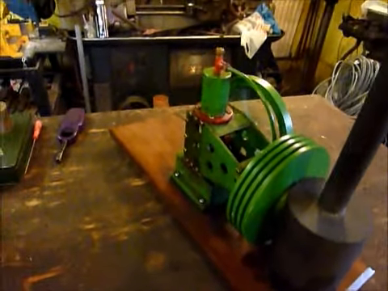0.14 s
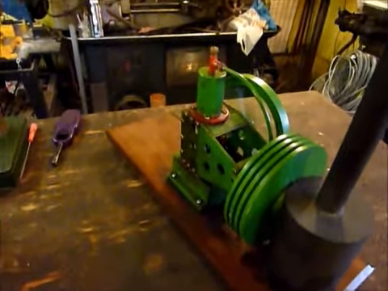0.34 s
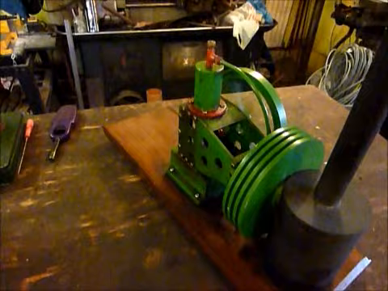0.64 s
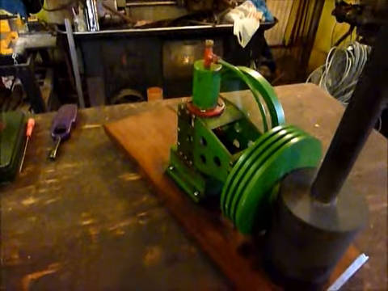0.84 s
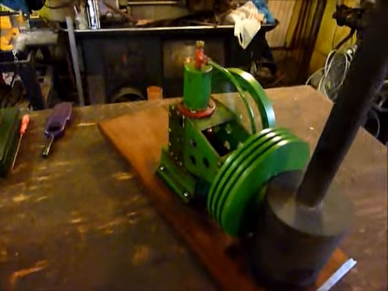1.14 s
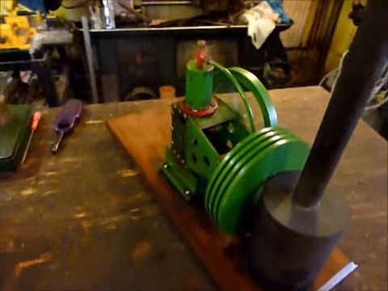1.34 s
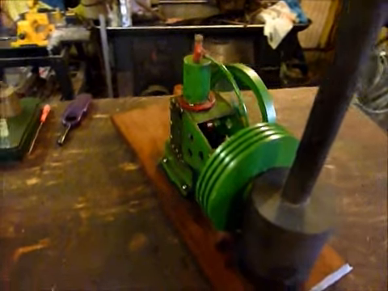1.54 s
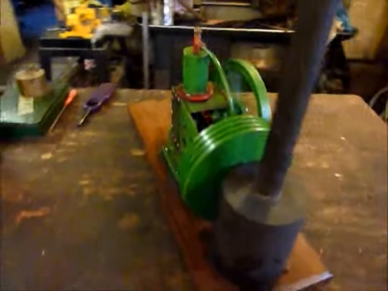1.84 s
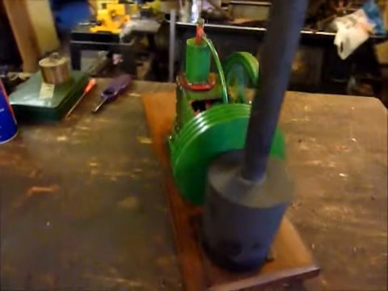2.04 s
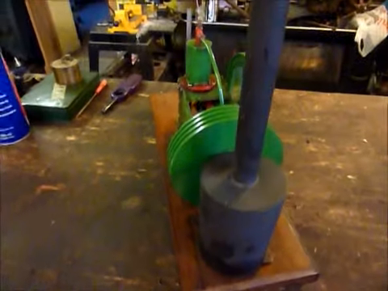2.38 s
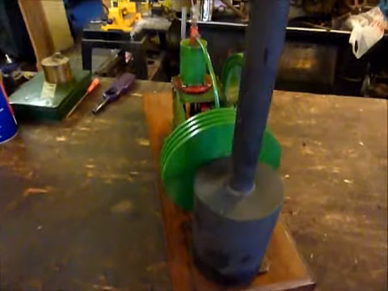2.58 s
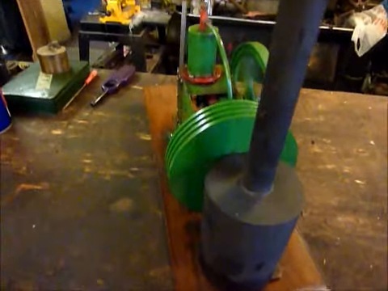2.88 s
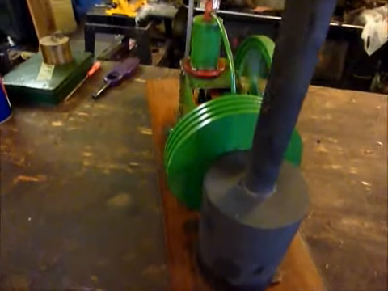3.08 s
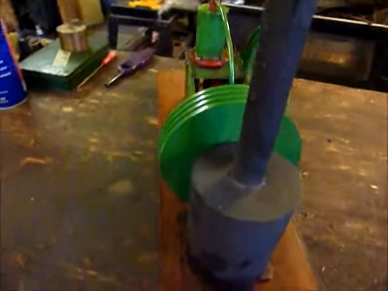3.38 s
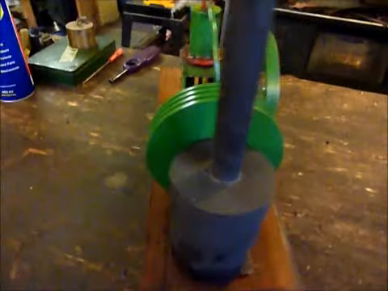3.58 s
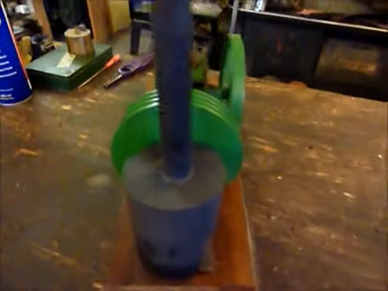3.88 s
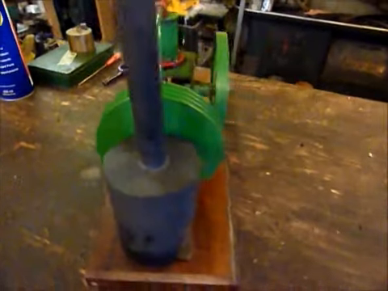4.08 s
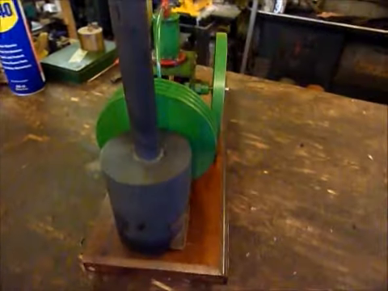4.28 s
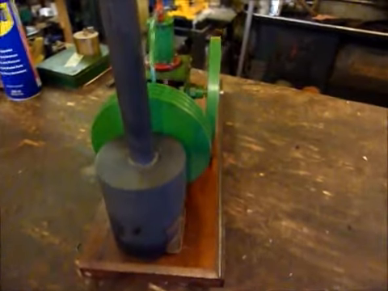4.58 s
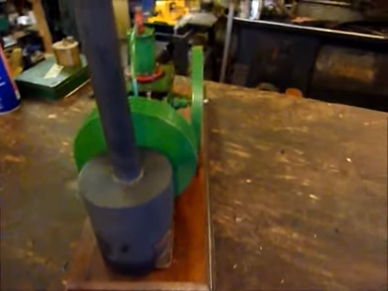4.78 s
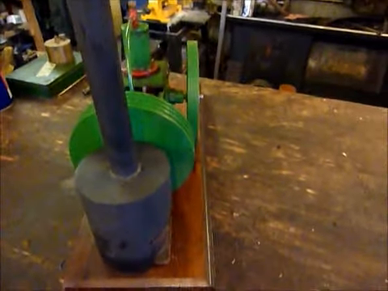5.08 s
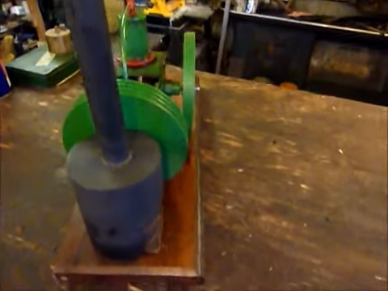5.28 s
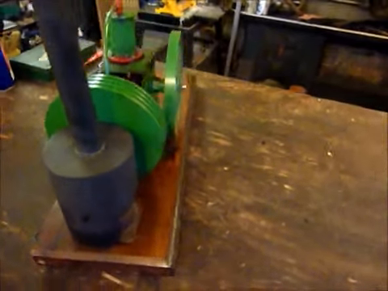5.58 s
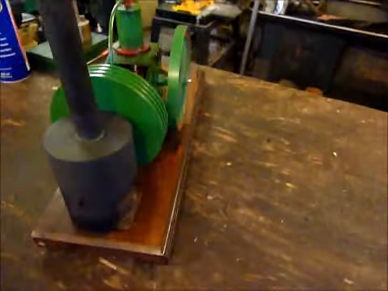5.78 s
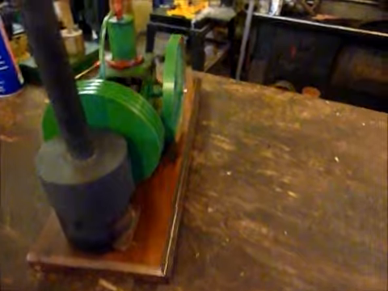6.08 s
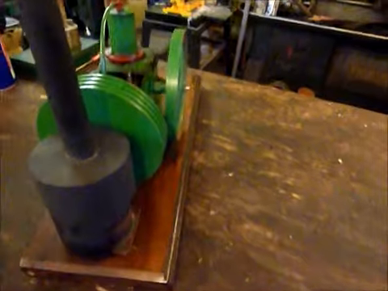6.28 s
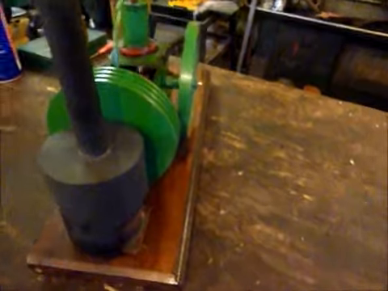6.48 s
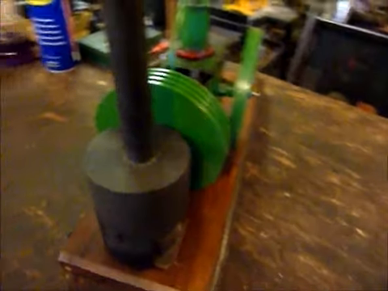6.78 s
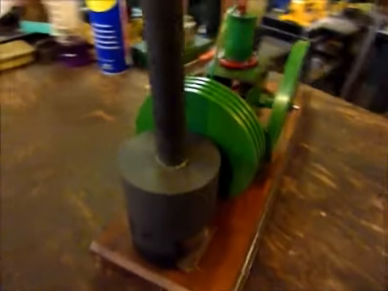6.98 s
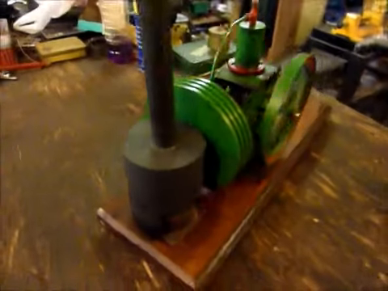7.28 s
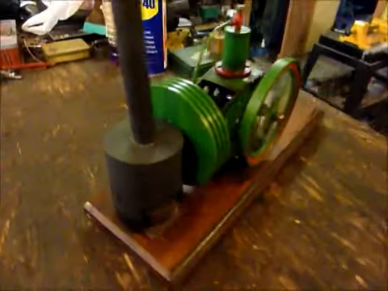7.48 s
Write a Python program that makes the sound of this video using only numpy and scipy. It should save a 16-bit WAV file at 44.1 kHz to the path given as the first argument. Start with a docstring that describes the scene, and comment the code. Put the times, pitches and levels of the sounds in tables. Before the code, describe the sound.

A model hot air engine runs throughout on a wooden board, close to a hand-held microphone and fairly dry, over the faint hum of a small workshop. It turns about six times a second, each turn giving a dull knock and then a rattle that briefly ring the metal frame and board. About once a second the knock goes soft and builds up again. From 0.4 seconds the rattle breaks into recurring bouts of bright metallic ticks, the longest from about 4.9 to 5.8 seconds. Someone moves round the bench, with a soft bump near 0.6 seconds and light scuffs from about 2 seconds. Short, sharp cracks like grit underfoot begin at 1.6 seconds and cluster between 3 and 5.8 seconds, the loudest at 4.7 and another strong one near 5.4. A last soft bump comes at 7.5 seconds as the engine keeps running.

```python
"""A small, humming workshop; a hand-held camera microphone close to a model hot air engine on a board.
From the start it turns six times a second: play in the linkage knocks, then rattles on the return stroke,
both ringing frame and board. About once a second the knock goes soft and builds up again.
From 0.4 s the return has bouts of bright metallic ticks. Then someone moves round the bench: scuffs, soft
bumps and, from 1.6 s, cracks like grit underfoot, the loudest at 4.7 s. A last bump comes at 7.5 s."""
import sys
import numpy as np
from scipy import signal
from scipy.fft import rfft, irfft
from scipy.io import wavfile

SR = 44100
rng = np.random.default_rng(int(sys.argv[2]) if len(sys.argv) > 2 else 0)


def transcribe(signal):
    """Save signal, clipped to [-1, 1], as a 16-bit WAV file at the path in sys.argv[1]."""
    frames = np.atleast_2d(signal).T
    limited = np.clip(frames, -1, 1)
    pcm = np.round(limited * 32767).astype(np.int16)
    wavfile.write(sys.argv[1], SR, pcm)


N = 336924
TIME = np.arange(N) / SR
RING = TIME[:SR // 2]  # time axis of one decay


def undb(db):
    """Decibels to gain."""
    return 10 ** (np.asarray(db) / 20)


def unit(x):
    """Scale to rms 1."""
    return x / np.sqrt(np.mean(x ** 2))


def fade(t60):
    """A decay of 60 dB in t60 seconds."""
    return np.exp(-np.log(1000) * RING / t60)


def add(track, s, sound):
    """Mix a sound into a track at s seconds."""
    i = min(max(int(s * SR), 0), len(track))
    track[i:i + len(sound)] += sound[:len(track) - i]


def at_hz(points, hz):
    """Read (Hz, value) points on a log-frequency axis."""
    f, value = np.transpose(points)
    return np.interp(np.log(hz + 1), np.log(f), value)


def resonate(x, hz, width):
    """Two-pole band-pass."""
    return signal.lfilter(*signal.iirpeak(hz, hz / width, fs=SR), x)


def noise_ring(hz, width, t60):
    """A band of noise that dies away."""
    band = resonate(rng.standard_normal(len(RING)), hz, width)
    return unit(resonate(band, hz, width)) * fade(t60)


def colour(x, points, tilt_db=0, size=512):
    """Causal filter with the given spectrum, tilted by tilt_db an octave about 3 kHz."""
    hz = np.fft.rfftfreq(size, 1 / SR)
    db = at_hz(points, hz) + tilt_db * np.log2(np.clip(hz, 500, 8000) / 3000)
    cepstrum = irfft(np.log(undb(db)))
    cepstrum[1:size // 2] *= 2  # fold to minimum phase
    cepstrum[size // 2 + 1:] = 0
    return signal.lfilter(irfft(np.exp(rfft(cepstrum))), 1, x)


# Room tone at the microphone: f/Hz, relative level/dB
ROOM_TONE = [(15, -52.5), (25, -19.5), (279, 2), (331, -6), (401, -1.5), (576, 0), (828, -4.5), (911, -3),
             (1220, -6), (2230, -10.5), (2640, -14.5), (3050, -11), (5440, -20), (6920, -20), (8000, -35),
             (10400, -65), (17600, -120)]
# Tones of the workshop's hum: f/Hz, level/dB
HUM_TONES = [(119, -73.5), (162, -73), (268, -79.5), (334, -71)]


def workshop(air_db, waver_rad):
    """Steady room tone and a hum whose tones waver in phase."""
    shape = undb(at_hz(ROOM_TONE, np.fft.rfftfreq(N, 1 / SR)))
    out = undb(air_db) * unit(irfft(rfft(rng.standard_normal(N)) * shape, N))
    knots = np.linspace(0, TIME[-1], 80)
    for hz, db in HUM_TONES:
        waver = waver_rad * np.interp(TIME, knots, rng.standard_normal(len(knots)))
        out += undb(db) * np.sqrt(2) * np.sin(2 * np.pi * hz * TIME + waver)
    return out


# Decay of the room, heard at the bench: f/Hz, t60/s
ROOM_DECAY = [(150, 0.27), (1000, 0.28), (3500, 0.3), (8000, 0.39)]


def room_echo(x, gap_s, bands=8):
    """Short, diffuse echo of the cluttered workshop; its pattern changes as the microphone moves."""
    edges, hz = np.geomspace(60, 12000, bands + 1), np.fft.rfftfreq(len(RING), 1 / SR)
    out = np.zeros(N)
    for second in range(int(TIME[-1]) + 2):
        noise, tail = rfft(rng.standard_normal(len(RING))), np.zeros(len(RING))
        for lo, hi in zip(edges, edges[1:]):
            band = irfft(noise * (hz >= lo) * (hz < hi), len(RING))
            tail += band * fade(at_hz(ROOM_DECAY, np.sqrt(lo * hi)))
        tail *= np.clip(RING / gap_s - 1, 0, 1)
        near = np.abs(TIME - second) < 1
        part = x[near] * np.cos(np.pi / 2 * (TIME[near] - second))  # crossfade between patterns
        add(out, TIME[near][0], signal.fftconvolve(part, tail / np.linalg.norm(tail)))
    return out


# Scuffs and low rumbles round the bench: middle t/s, half-length/s, level/dB, f/Hz, width/Hz
BENCH_SCUFFS = [(.665, 0.048, -63, 5950, 2500), (2.113, 0.18, -59.5, 2350, 2200),
                (2.323, 0.06, -48.5, 2188, 2210), (2.67, 0.34, -62, 2800, 1800),
                (3.158, 0.075, -49, 1800, 3430), (4.043, 0.42, -65.5, 80, 22),
                (4.279, 0.0089, -47, 2800, 6100), (4.471, 0.19, -65.5, 4500, 4000),
                (5.055, 0.35, -54.5, 231, 30), (5.36, 0.013, -36, 2500, 2400),
                (5.408, 0.16, -56.5, 273, 35.8), (5.719, 0.079, -49.5, 2340, 2580),
                (6.266, 0.2, -61.5, 3600, 5300), (7.49, 0.034, -53, 3000, 3100)]


def scuffs(grain_db):
    """Rubbing: dense uneven grains that swell and die away."""
    out = np.zeros(N)
    for s, half_length, db, hz, width in BENCH_SCUFFS:
        noise, roughness = rng.standard_normal((2, SR))
        rub = unit(resonate(noise * undb(grain_db * roughness), hz, width))
        swell = np.hanning(min(int(2 * half_length * SR), SR))
        add(out, s - half_length, undb(db) * swell * rub[:len(swell)])
    return out


# Bumps round the bench: t/s, level/dB, f/Hz, t60/s
SOFT_BUMPS = [(.646, -38, 390, 0.11), (.648, -46.5, 201, 0.19), (1.588, -27, 613, 0.034),
              (4.657, -35.5, 466, 0.061), (5.432, -38, 430, 0.057), (7.493, -44.5, 214, 0.22),
              (7.496, -46.5, 402, 0.18)]


def bumps(width_share):
    """Soft, low thuds of someone shifting about."""
    out = np.zeros(N)
    for s, db, hz, t60 in SOFT_BUMPS:
        add(out, s, undb(db) * noise_ring(hz, hz * width_share, t60))
    return out


# Spectrum of a crack: f/Hz, relative level/dB
CRACK_SPECTRUM = [(60, -37), (400, -16.5), (900, -15.5), (1500, 0.5), (2400, -0.5), (2800, -2.5), (3400, 1),
                  (4200, -0.5), (5000, -2), (6200, 0.5), (7200, -6.5), (8000, -9)]
# Cracks from the floor: t/s, relative level/dB, ring f/Hz, relative ring level/dB, tilt/dB per octave
FLOOR_CRACKS = [(1.5882, -27.5, 3090, -4.5, -5.5), (2.6170, -34, 2290, -7, -8),
                (3.0085, -22, 3450, -2, -2.5), (3.5772, -20.5, 3530, -1.5, 1),
                (3.7338, -19, 6520, -2.5, 3.5), (3.7410, -38, 7100, 10, -1), (3.8618, -26, 6510, -3, 4.5),
                (3.8670, -34, 7050, 1, 4.5), (3.8765, -24.5, 6230, -13, -0.5),
                (3.9935, -23.5, 2300, -6, -2), (4.2842, -25, 1880, -9.5, -4),
                (4.2920, -25.5, 1970, -2.5, -2.5), (4.6582, -13, 2020, -8.5, 1),
                (5.3605, -22, 3415, 8, -4.5), (5.3630, -28.5, 6170, -4, 15.5),
                (5.6252, -36, 2430, -29, -1.5), (5.6335, -34.5, 2370, -24, -4.5),
                (5.6748, -29.5, 2520, -3, -5), (5.7355, -26, 4130, -5, -7), (5.7393, -19, 1956, -5.5, -1.5),
                (6.1894, -34.5, 3830, -13, -1)]


def cracks(gain_db, snap_t60, rise_s, ring_t60, ring_db, splinter_db):
    """Like grit underfoot: a very short broadband snap with one brief resonance, then tiny splinters."""
    out, short = np.zeros(N), slice(SR // 10)
    rise = 1 - np.exp(-RING / rise_s)
    for s, crack_db, hz, share_db, tilt_db in FLOOR_CRACKS:
        noise, roughness = rng.standard_normal((2, len(RING)))
        splinters = undb(splinter_db + 6.3 * roughness) * fade(0.16)
        burst = noise * (rise * fade(snap_t60) + splinters)
        snap = colour(burst[short], CRACK_SPECTRUM, tilt_db)
        ring = np.sin(2 * np.pi * hz * RING) * rise * fade(ring_t60)
        add(out, s, undb(gain_db + crack_db) * (snap + undb(ring_db + share_db) * ring[short]))
    return out


def crank_turns(first_knock_s=0.0723, turn_hz=5.9633, speedup_hz_per_s=0.00536):
    """Turns of the flywheel since the first knock; it gains speed very slowly."""
    t = TIME - first_knock_s
    return turn_hz * t + speedup_hz_per_s * t ** 2 / 2


def knock_times():
    """The moment of each full turn."""
    turns = crank_turns()
    return np.interp(np.arange(int(turns[-1]) + 1), turns, TIME)


def piston(db):
    """The piston hisses faintly as it slides, twice a turn."""
    speed = np.abs(np.sin(2 * np.pi * crank_turns()))
    return undb(db) * speed * unit(resonate(rng.standard_normal(N), hz=6600, width=2000))


# Modes of frame and board, close up: f/Hz, t60/s, relative level/dB in a knock, the same in a rattle
FRAME_MODES = [(166, 0.099, -19.5, -19), (269, 0.34, -30.5, -17.5), (330.5, 0.22, -10.5, -8.5),
               (421, 0.029, -6.5, 0.5), (501, 0.26, -12, -12), (561, 0.032, 7, 4.5), (595.8, 0.028, 7, 4.5),
               (713, 0.042, -7.5, -17.5), (761, 0.093, -12, -9), (920.6, 0.084, -2, -2),
               (1019, .07, -6.5, -5.5), (1043, 0.044, -0.5, -5), (1104, 0.027, -8, -6.5),
               (1410, .016, 6.5, 12), (1558, 0.0038, 16, 16.5), (1712, 0.025, 0.5, 5), (1974, 0.014, -6, 4),
               (2238, 0.011, 11.5, 14), (2292, 0.014, 8, 11), (3016, 0.061, -11, 1.5),
               (3357, 0.07, -21.5, 1.5), (3600, 0.014, -25.5, 11), (3866, 0.063, -26.5, 3.5),
               (3940, 0.012, -19.5, -3.5), (4698, 0.019, -21.5, 6), (5110, 0.036, -27.5, -11.5)]


def ringing(detune):
    """The modes after a blow, one a row; neighbours start in opposite senses, and pitches shift a bit."""
    hz, t60, _, _ = np.transpose(FRAME_MODES)
    hz = hz * (1 + detune * rng.standard_normal(len(hz)))
    sense = (-1) ** np.arange(len(hz))
    t = RING[:SR // 8]
    decay = np.exp(-np.log(1000) * np.outer(1 / t60, t))
    return sense[:, None] * np.sin(2 * np.pi * np.outer(hz, t)) * decay


# Bouts of metal hitting metal: start t/s, length/s, stroke level/dB, mid-bout treble gain/dB
METAL_BOUTS = [(0.4, 0.16, -41.5, -2.5), (1.096, 0.35, -42, -0.5), (1.61, 0.53, -44, -1),
               (2.757, 0.39, -45, 2), (3.453, 0.39, -42.5, -1), (4.264, 0.33, -41.5, 1),
               (4.915, 0.9, -44.5, -1), (6.08, 0.32, -45, 1.5), (6.75, 0.16, -41, -2.5),
               (7.08, 0.16, -42.5, -3)]


def return_strokes(dull_lag_s=0.072, hard_lag_s=0.0704, takeover=0.51, edge_db=7.5):
    """One return a turn (t/s, level/dB, treble/dB): dull, but early and bright in a hard bout."""
    strokes = []
    for s in knock_times():
        lag, treble_db = dull_lag_s, -16
        db = -47 + takeover * softening_db(s)  # grows as the knock softens
        for start, length, hard_db, height_db in METAL_BOUTS:
            place = 2 * (s + hard_lag_s - start) / length - 1  # -1 to 1 across the bout
            if abs(place) < 1:
                lag, db, treble_db = hard_lag_s, hard_db, height_db - edge_db * place ** 2
        strokes.append((s + lag, db + 0.5 * rng.standard_normal(), treble_db - rng.standard_normal()))
    return strokes


# Snap of metal on metal: f/Hz, relative level/dB
METAL_SNAP = [(500, -17.5), (2000, -7.5), (3000, -4), (4700, -3), (5300, -7.5), (6300, -4.5), (8000, -13)]


def rattles(ring_db, bounce_s, bounce_db, scatter_db, treble_hz, snap_db, snap_t60, bounces=4):
    """The linkage chatters on the return; harder contact snaps more and rings the high metal modes."""
    out = np.zeros(N)
    hz, _, _, mode_db = np.transpose(FRAME_MODES)
    treble = 1 / (1 + (treble_hz / hz) ** 10)
    for s, rattle_db, treble_db in return_strokes():
        gaps = bounce_s * rng.uniform(.5, 1.5, bounces)
        modes = ringing(detune=0.0014)
        for k, lag in enumerate(np.cumsum(gaps) - gaps[0]):
            gains = undb(mode_db + treble_db * treble + scatter_db * rng.standard_normal(len(hz)))
            add(out, s + lag, undb(ring_db + rattle_db + k * bounce_db) * (gains @ modes))
        burst = rng.standard_normal(len(RING)) * fade(snap_t60)
        snap = colour(burst[:SR // 10], METAL_SNAP)
        add(out, s - .001, undb(snap_db + rattle_db + treble_db) * snap)
    return out


# Spells in which the knock goes soft: start t/s, length/s, drop/dB
KNOCK_LULLS = [(0.06, 0.35, 6), (1.06, 0.2, 6), (1.9, 0.43, 5), (2.9, 0.68, 5.8), (4.206, 0.52, 7.5),
               (5.408, 0.56, 4.5), (6.574, 0.19, 9), (7.58, 0.3, 5.5)]


def softening_db(s, recovery_curve=3.1):
    """How far the knock is under full strength: a sudden drop, then a recovery that gathers pace."""
    return sum(drop * (1 - ((s - start) / length) ** recovery_curve)
               for start, length, drop in KNOCK_LULLS if start <= s < start + length)


def knocks(full_db, spread_db, scatter_db, crisp_from_db, crisp_share, crisp_above_hz, buzz_db):
    """The rod takes up its play with one dull blow a turn; small loose parts buzz briefly after it."""
    out = np.zeros(N)
    hz, _, mode_db, _ = np.transpose(FRAME_MODES)
    strokes = [(s, full_db - softening_db(s) + spread_db * rng.standard_normal()) for s in knock_times()]
    for s, knock_db in strokes:
        # a harder knock is a shorter contact and reaches further up the modes
        crisp_db = crisp_share * (knock_db - crisp_from_db) * (hz > crisp_above_hz)
        gains = undb(knock_db + mode_db + crisp_db + scatter_db * rng.standard_normal(len(hz)))
        add(out, s, gains @ ringing(detune=0.01))
        add(out, s, undb(knock_db + buzz_db) * noise_ring(hz=1760, width=550, t60=0.056))
    return out


def scene():
    """At the bench: the engine is close and fairly dry; bumps and scuffs carry the most room."""
    engine = knocks(full_db=-36.5, spread_db=0.5, scatter_db=1.0,
                    crisp_from_db=-38.5, crisp_share=0.41, crisp_above_hz=1900, buzz_db=-8.5)
    engine += rattles(ring_db=-1.5, bounce_s=.0018, bounce_db=-3.0, scatter_db=1.5,
                      treble_hz=3000, snap_db=7.5, snap_t60=0.032)
    grit = cracks(gain_db=8.5, snap_t60=0.0078, rise_s=0.00032,
                  ring_t60=0.02, ring_db=-4, splinter_db=-22.5)
    moving = bumps(width_share=0.74) + scuffs(grain_db=8.0)
    echo = room_echo(undb(-9.0) * engine + undb(-11.5) * grit + undb(-6.5) * moving, gap_s=0.0039)
    background = workshop(air_db=-54.5, waver_rad=0.83) + piston(db=-72.0)
    return (background + echo + moving + grit + engine)[None]


def record(dry):
    """The camera's mono microphone channel: a narrow treble notch and a steep cut above 7.6 kHz."""
    notched = dry - resonate(dry, hz=5400, width=220)
    return signal.sosfilt(signal.ellip(8, .3, 70, 7600, fs=SR, output="sos"), notched)


dry = scene()
out = record(dry)
transcribe(out)
```